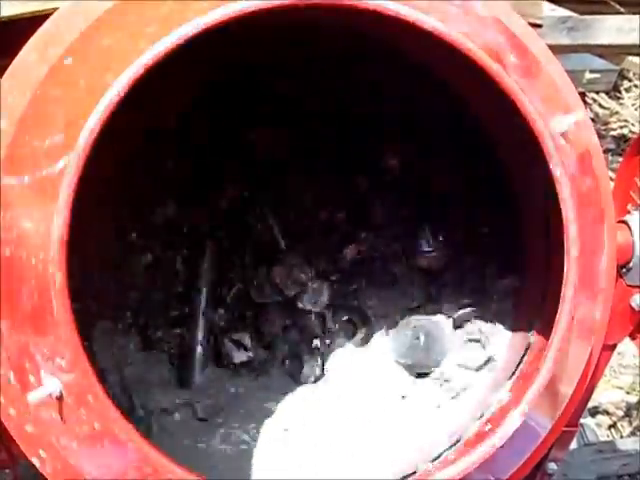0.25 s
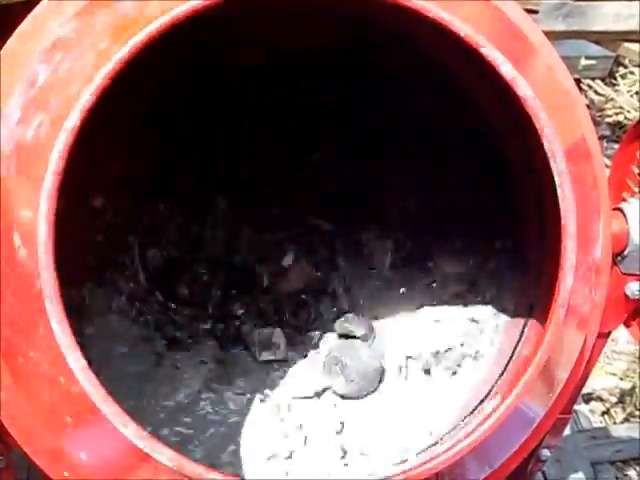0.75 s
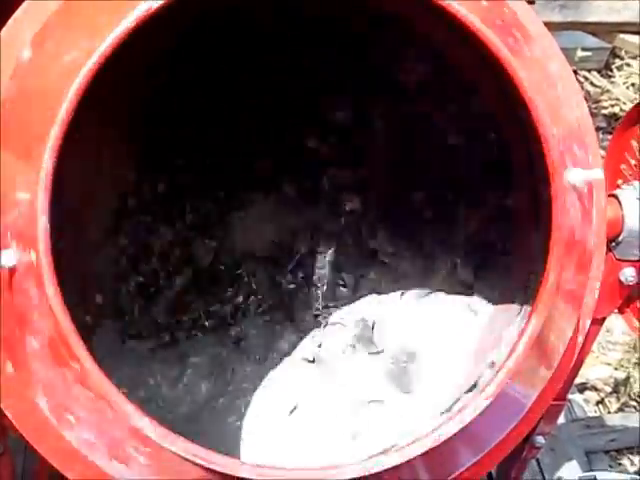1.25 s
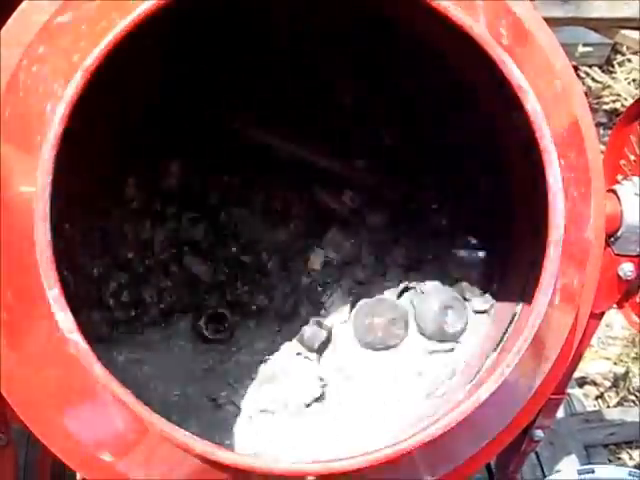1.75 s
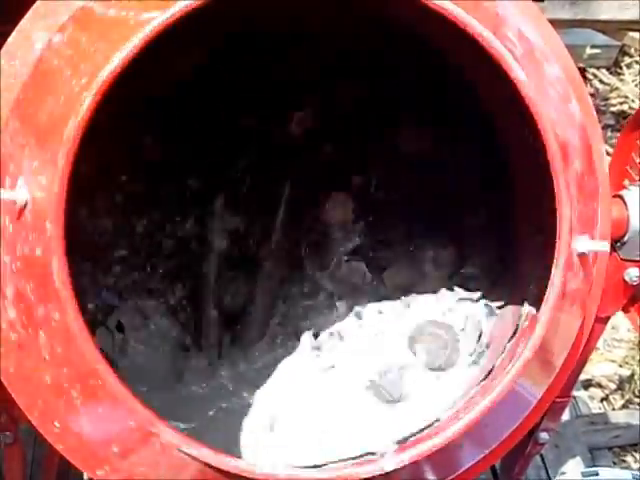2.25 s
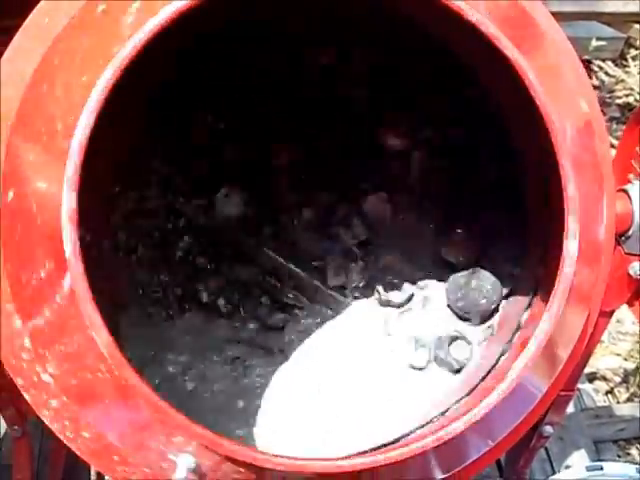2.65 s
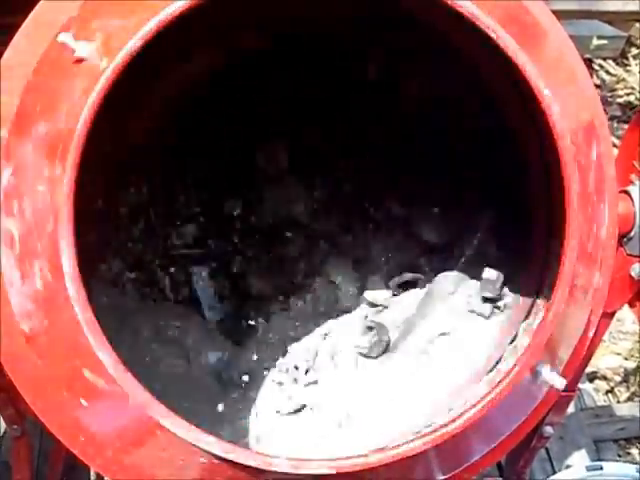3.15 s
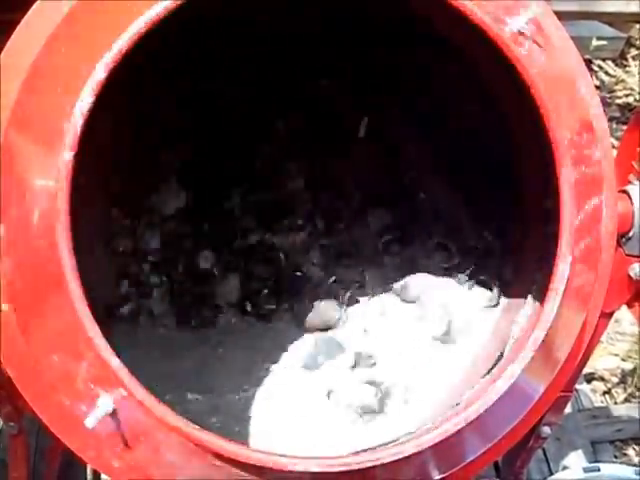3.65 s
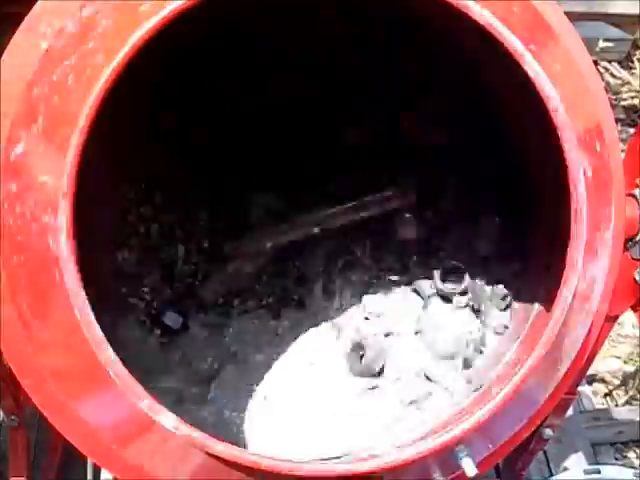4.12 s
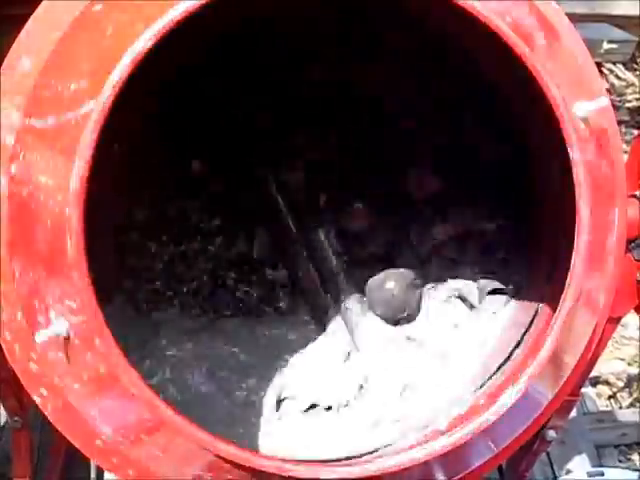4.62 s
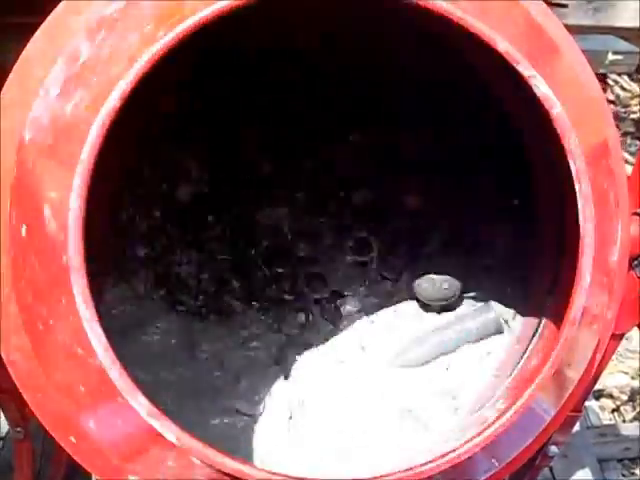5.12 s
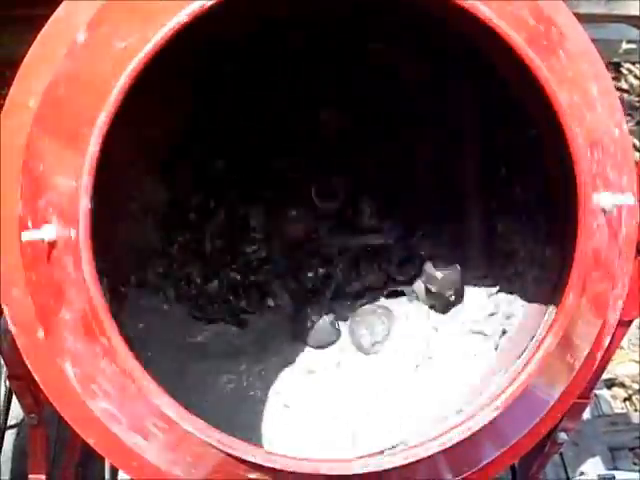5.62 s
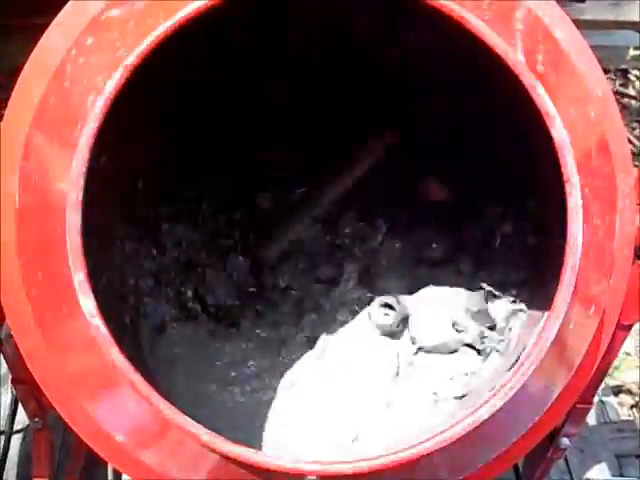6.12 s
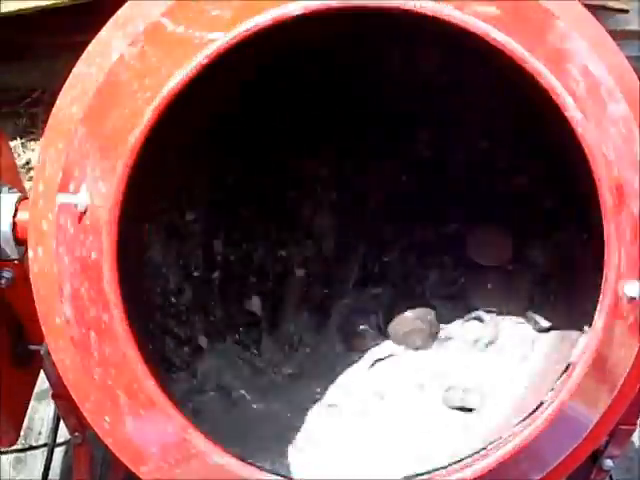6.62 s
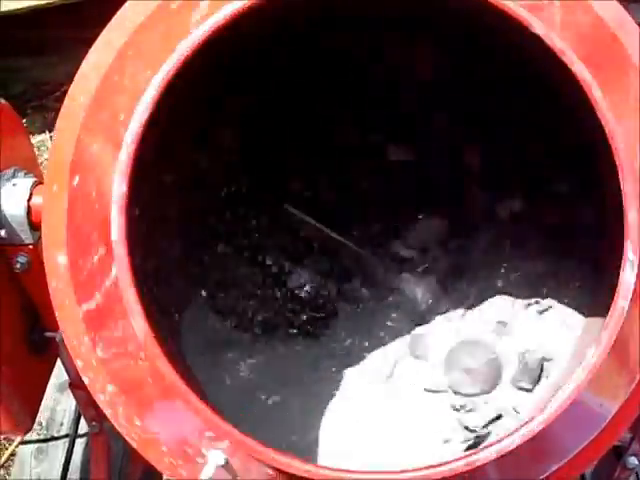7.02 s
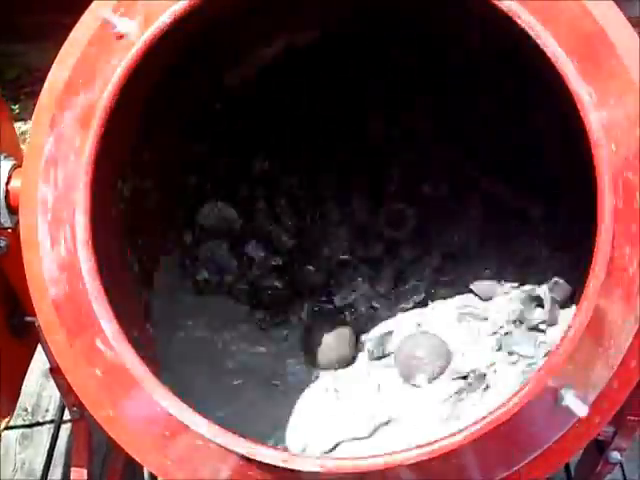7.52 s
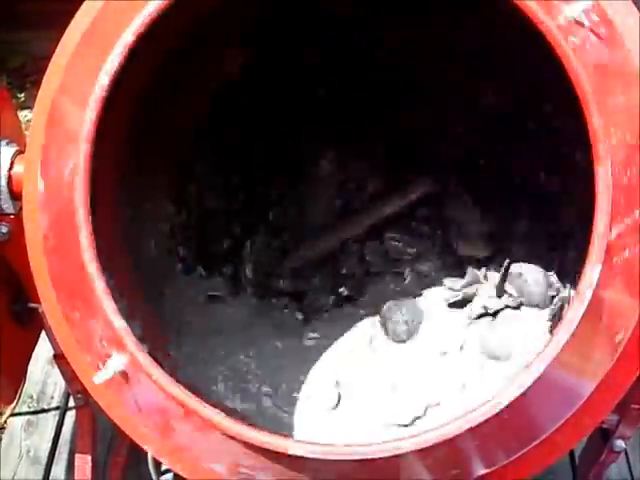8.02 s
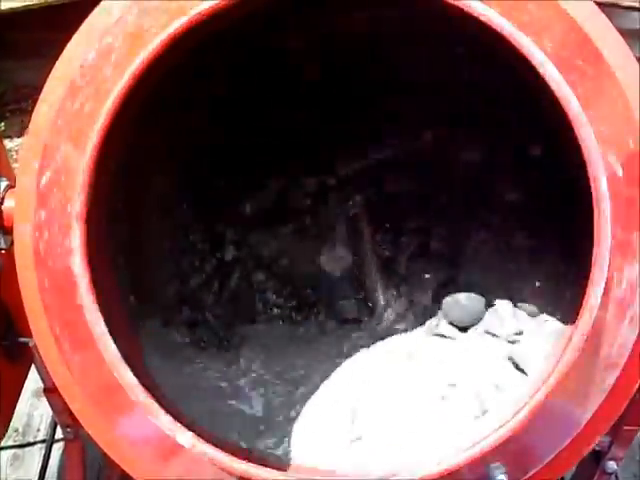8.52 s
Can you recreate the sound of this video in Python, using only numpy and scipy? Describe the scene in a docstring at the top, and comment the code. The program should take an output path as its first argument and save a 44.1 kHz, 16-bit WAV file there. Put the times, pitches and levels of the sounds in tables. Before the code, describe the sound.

An electric mixer's steel drum is already turning, close to the microphone, and keeps going for about nine seconds. Its gears and rolling load make a rumbling drone over a low hum, the tone shifting in a cycle of roughly 2.2 seconds. Grit hisses and small metal pieces patter constantly inside. Heavy steel balls and rods land irregularly, around ten times a second, with sharp cracks, midrange clunks and hollow booms from the shell. Harder hits come at about 1.1, 2.9, 3.1 and 3.7 seconds, with a deeper boom at 2.2. Short, bright steel rings stand out near 4 seconds, with a loud clang at 6.3 and a cluster around 8. The tumble swells and ebbs, thinning briefly near 4.2 and 6.6 seconds. The treble is slightly dull, and the hardest blows overload the microphone, followed by a quick dip in level.

```python
"""An electric mixer's steel drum turns, tumbling steel balls, rods and grit.
Gear teeth and the rolling load shake the shell into a rumbling drone, and the stand hums beneath it.
Grit hisses, small pieces clatter, heavy ones crack and boom on the wall, rods and other steel ring.
A small camera close by hears it through a narrow band, overloads on the hardest blows, then ducks."""
import sys
import numpy as np
from scipy import signal
from scipy.fft import rfft, irfft, next_fast_len
from scipy.io import wavfile
from scipy.ndimage import uniform_filter1d

SR = 44100
rng = np.random.default_rng(int(sys.argv[2]) if len(sys.argv) > 2 else 0)


def generate_wav(signal):
    """Clip the signal to [-1, 1] and save it as 16-bit WAV at the path in sys.argv[1]."""
    frames = np.transpose(np.atleast_2d(signal))
    scaled = np.clip(frames, -1, 1) * 32767
    pcm = np.round(scaled).astype(np.int16)
    wavfile.write(sys.argv[1], SR, pcm)


N = 386757
TEETH_PER_S, TURN_S = 44.0, 2.21
HEAVY, SMALL, LOW_SHAKE, SHELL_RING = 1, 2, 3, 4  # columns of the load's levels

# The drum shell's low, middle and high modes: pitch_hz, width_hz
SHELL_MODES = [(157, 12), (349, 14), (544, 7)]
# The bright tone of steel hitting steel: frequency_hz, level_db
STEEL_SPECTRUM = [(760, -34), (1300, -8), (1390, -8), (1490, -28.5), (1690, -6), (1890, -18.5), (2020, -9),
                  (2260, -12.5), (2500, -9), (2780, -2.5), (3450, -7.5), (3710, -5.5), (3880, -12),
                  (4060, -12), (4900, -12.5), (6370, -27.5), (10800, -120)]


def gain_of(db):
    """Decibels to a gain."""
    return 10 ** (np.asarray(db) / 20)


def unit_rms(x):
    """Scales to rms 1."""
    return x / np.sqrt(np.mean(x ** 2) + 1e-20)


def coloured(x, spectrum):
    """Equalises x along a curve of (frequency_hz, level_db) points."""
    hz, db = np.transpose(spectrum)
    bins_hz = np.fft.rfftfreq(len(x), 1 / SR)
    curve_db = np.interp(np.log(bins_hz + 1), np.log(hz), db, -90, -90)
    return irfft(rfft(x) * gain_of(curve_db), len(x))


def resonate(x, hz, width_hz):
    """One resonance as a complex wave: the real part is the sound, the magnitude its envelope."""
    radius = np.exp(-np.pi * width_hz / SR)
    return 2 * signal.lfilter([1 - radius], [1, -radius * np.exp(2j * np.pi * hz / SR)], x)


def burst(spectrum, t60_s, rise_s):
    """Many modes struck at once: coloured noise with a quick attack and a decay."""
    t = np.arange(8192) / SR
    noise = unit_rms(coloured(rng.standard_normal(len(t)), spectrum))
    return noise * (1 - np.exp(-t / rise_s)) * gain_of(-60 * t / t60_s) / 2


def struck(hz, t60_s):
    """One mode set ringing by a single blow."""
    t = np.arange(8192) / SR
    return np.sin(2 * np.pi * hz * t) * gain_of(-60 * t / t60_s) * (1 - np.exp(-t / 0.00077))


def knocks(spectrum, per_s, spread_db, t60_s, pitch_range_hz, pieces):
    """Random knocks of uneven force, each from one of several pieces with its own pitch."""
    out = np.zeros(N)
    for hz in np.geomspace(*pitch_range_hz, pieces):
        force = gain_of(spread_db * np.minimum(rng.exponential(1, N), 4))
        hits = force * (rng.random(N) < per_s / pieces / SR)
        knock = burst(spectrum, t60_s * rng.uniform(1.0, 1.2), rise_s=0.00026)
        ring = resonate(knock, hz, width_hz=0.049 * hz).real
        out += signal.oaconvolve(hits, knock + 3.2 * ring)[:N]
    return unit_rms(out)


def load_db(column):
    """The slow swell and ebb of one part of the tumble."""
    # The tumbling load's levels: time_s, heavy_db, small_db, extra_low_shake_db, extra_shell_ring_db
    levels = [(0.0, -25.5, -29.5, 1.5, -1), (0.51, -26, -30.5, 0, 2), (0.68, -23.5, -29.5, -2.5, 3),
              (2.29, -27, -32.5, -3, -3), (2.93, -21, -26, 2.5, 0.5), (3.32, -25.5, -31.5, 3, -0.5),
              (3.86, -26.5, -30, -3, 4), (3.98, -28, -30, 1, -1), (4.17, -33, -35, 0.5, -0.5),
              (4.64, -28, -33, -0.5, 3), (4.88, -21.5, -27, -1, 0.5), (6.2, -28, -30.5, -1.5, -0.5),
              (6.32, -24, -29, 4, -1), (6.6, -34, -31.5, -3, 3), (6.81, -25, -30.5, 5, -2),
              (7.3, -24.5, -27.5, -1.5, 3), (7.79, -28.5, -30.5, 3, 1.5), (8.21, -27, -31, -2.5, -1.5),
              (8.55, -24, -26, -2, 0), (8.77, -21.5, -27, 3, 0)]
    rows = np.array(levels)
    return np.interp(np.arange(N) / SR, rows[:, 0], rows[:, column])


def turn_gain(column, extra):
    """The load damps each mode in its own part of the turn; this cycle rides on the heavy pieces' level."""
    # Level offsets through one turn: time_s, low_mode_db, middle_mode_db, high_mode_db, stand_db
    one_turn = [(0.05, -2.5, -7, 3, -13), (0.3, -10.5, -2.5, 6.5, -10), (0.55, -9.5, -3.5, 9, -15),
                (0.75, -14.5, -3, 0, -15), (0.95, -12, -0.5, 11, -15), (1.15, -14.5, -4, -2, -14.5),
                (1.35, -6.5, -0.5, 8, -8), (1.55, 1, -9.5, -15, -8.5), (1.78, 5.5, -10.5, -4, -3.5),
                (1.95, -2.5, -6.5, -14.5, -8)]
    rows = np.array(one_turn)
    turn_db = np.interp(np.arange(N) / SR, rows[:, 0], rows[:, column], period=TURN_S)
    return gain_of(load_db(HEAVY) + load_db(extra) + turn_db)


def drum_shell():
    """Gear teeth tap the rim steadily and the load rolls unevenly, driving a rumble and three modes."""
    # The shell's broad rumble: frequency_hz, level_db
    rumble_spectrum = [(65, -44.5), (110, -21), (157, -13), (204, -25.5), (254, -7), (346, -8.5),
                       (383, -23.5), (415, -10), (445, -20), (541, 2), (599, -4.5), (1130, -13),
                       (1500, -39.5), (1700, -26.5), (2210, -62.5), (3740, -120)]
    drift = uniform_filter1d(uniform_filter1d(rng.standard_normal(N + 1), 1500), 1500)
    backlash_teeth = .02 * unit_rms(drift)
    tooth_count = np.floor(np.arange(N + 1) * TEETH_PER_S / SR + backlash_teeth)
    taps = np.diff(tooth_count) * gain_of(8.2 * np.clip(rng.standard_normal(N), -2, 1))
    drive = 0.56 * unit_rms(taps) + rng.standard_normal(N)
    drone = np.zeros(N)
    for k, (hz, width_hz) in enumerate(SHELL_MODES):
        swing = resonate(resonate(drive, hz, width_hz).real, hz, 5.8 * width_hz)
        sustained = swing.real / (abs(swing) + 1e-9) ** .7  # constantly driven, so steadier than noise
        drone += turn_gain(column=1 + k, extra=SHELL_RING if k else LOW_SHAKE) * unit_rms(sustained)
    tooth_thud = burst(rumble_spectrum, t60_s=0.095, rise_s=0.0068)
    gears = unit_rms(signal.oaconvolve(taps, tooth_thud)[:N])
    rolling = knocks(rumble_spectrum, per_s=420, spread_db=1.86, t60_s=0.17,
                     pitch_range_hz=(250, 1400), pieces=10)
    return drone + gain_of(load_db(HEAVY) + 2) * (1.613 * rolling + 1.08 * gears)


def stand_hum():
    """The stand hums at the tooth rate and its octave, and shakes loosely."""
    # The stand's low shudder: frequency_hz, level_db
    shake_spectrum = [(12, -40.5), (20, -7.5), (32, -15.5), (64, -5.5), (125, 2), (160, -33.5), (280, -120)]
    shake = unit_rms(coloured(rng.standard_normal(N), shake_spectrum))
    tooth_phase = 2 * np.pi * TEETH_PER_S * np.arange(N) / SR
    hum = 0.38 * np.sin(tooth_phase) + 0.58 * np.sin(2 * tooth_phase)
    return turn_gain(column=4, extra=LOW_SHAKE) * (0.72 * shake + hum)


def clatter():
    """Grit hisses down the wall under a patter of small pieces."""
    grit = unit_rms(coloured(rng.standard_normal(N), STEEL_SPECTRUM))
    patter = knocks(STEEL_SPECTRUM, per_s=300, spread_db=3.76, t60_s=0.056,
                    pitch_range_hz=(1600, 4800), pieces=14)
    return gain_of(load_db(SMALL) + 1.5) * (0.56 * grit + 1.58 * patter)


def ringing_steel():
    """Rods and other pieces bend in two planes, so close modes beat; contact with the load adds waver."""
    # Rings and swells of rods and other steel pieces, near 2.8 or 3.8 kHz:
    # start_s, level_db, pitch_hz, t60_s
    rings = [(0.0313, -3.5, 2790, 0.1), (1.8768, -9, 3770, 0.065), (2.201, -21, 2814, 0.32),
             (2.285, -18, 2810, 0.17), (2.4155, -8, 3766, 0.1), (2.915, -6, 3800, 0.061),
             (3.115, -5.5, 2844, 0.056), (3.395, -15.5, 3760, 0.039), (3.5917, -18, 3730, 0.18),
             (3.635, -15.5, 3800, 0.069), (4.0377, 2, 3800, 0.15), (4.368, -6, 3780, 0.11),
             (4.9846, -7, 2880, 0.052), (5.0694, -19.5, 3790, 0.081), (5.407, -8.5, 3750, 0.035),
             (5.8935, -7, 2755, 0.042), (5.897, -8.5, 3820, 0.11), (6.32, -5.5, 3845, 0.066),
             (6.329, 7, 2840, 0.12), (6.383, -2, 2810, 0.12), (6.5044, -18, 3760, 0.1),
             (6.57, -18, 3880, 0.059), (7.9341, -9, 2680, 0.085), (8.0292, -8.5, 3820, 0.23),
             (8.0563, -1.5, 3812, 0.16), (8.089, -6, 3746, 0.09), (8.2047, -21.5, 2820, 0.14),
             (8.519, -6, 3730, 0.028)]
    out = np.zeros(N + SR)
    t = np.arange(SR // 2) / SR
    attack = 1 - np.exp(-t / .0008)
    for start_s, level_db, hz, t60_s in rings:
        jostle = unit_rms(uniform_filter1d(rng.standard_normal(len(t)), 300))
        waver = gain_of(2.5 * np.minimum(t / .03, 1) * jostle)
        pair = 1.41 * np.sin(2 * np.pi * hz * t) + 0.47 * np.sin(2 * np.pi * .991 * hz * t)
        decay_db = 60 * (t / t60_s) ** 1.134  # steepens as the load smothers the ring
        out[round(start_s * SR):][:len(t)] += gain_of(level_db - decay_db) * pair * waver * attack
    return out[:N]


def heavy_blows():
    """Each heavy piece ticks and cracks on steel, clunks on the wall and sets the shell booming."""
    # Heavy pieces landing: start_s, crack_db, crack_hz, clunk_db, clunk_hz, boom_db, ring_db
    landings = [(0.0333, -9, 2820, -18, 690, -22, -6), (0.1281, -11, 2780, -27, 610, -30, -24),
                (0.1979, -15, 3060, -25.5, 633, -24, -8.5), (0.2848, -9.5, 3060, -14.5, 767, -18.5, -7),
                (0.4514, -23, 2670, -12.5, 820, -20, -5), (0.6559, -6.5, 2960, -23, 610, -24, -4.5),
                (0.7143, -3.5, 3150, -13, 895, -32, -10), (0.8355, -23, 2850, -16, 650, -26, -18),
                (0.8954, -17, 3060, -9, 853, -20, -17), (1.0625, 3, 2880, -1, 944, -14.5, -12),
                (1.3354, -12.5, 2450, -16, 780, -14, -19), (1.4157, -14, 3100, -13, 860, -15, -10.5),
                (1.6003, -6.5, 3590, -20, 940, -17, -17), (1.715, -7, 3100, -13.5, 897, -23, -24),
                (1.7654, -5, 2500, -14.5, 1154, -25, -30), (1.7824, -10, 2840, -9, 813, -23, -28),
                (1.8334, -17, 2910, -5.5, 907, -23, -10), (2.0744, -17, 3180, -5, 1085, -24, -11),
                (2.1314, -15, 3650, -10, 737, -22, -16), (2.15, -10, 2620, -11.5, 730, -22, -14),
                (2.1934, -13, 2750, -15, 678, -4, -19), (2.3264, -15, 2690, -10.5, 1100, -20, -17),
                (2.3564, -21.5, 2690, -6, 1100, -38, -15.5), (2.4169, -9, 3790, -15, 940, -33, -22),
                (2.4568, -8, 3000, -33, 910, -31, -34), (2.5504, -14, 2720, -16, 826, -20.5, -10),
                (2.7566, -10.5, 2990, -15, 1244, -21, -21), (2.8654, -11, 2000, -14.5, 622, -18, -10.5),
                (2.9143, 0, 3670, -23, 624, -21, -15), (3.031, -12, 2950, -27, 650, -16, -2.5),
                (3.1114, 3.5, 2720, -7, 598, -19, -19), (3.2435, -9.5, 2810, -7, 1114, -22, -27),
                (3.4156, -10, 3800, -28, 921, -36, -12), (3.5453, -1.5, 3450, -10.5, 1110, -27, -30),
                (3.6631, -9, 3300, -11.5, 622, -20, -25), (3.705, 0, 3200, -24, 1115, -31, -24),
                (3.7898, -4.5, 2700, -13.5, 670, -28, -20), (3.8864, -12.5, 2900, -7.5, 756, -26, -34),
                (3.9599, -15, 2800, -19, 638, -22, -29), (4.0098, -11, 2210, -7, 1110, -16, -13),
                (4.0372, -6, 3780, -29, 643, -32, -28), (4.1584, -8.5, 2830, -12, 1100, -30, -16),
                (4.1904, -1.5, 2980, -10.5, 1146, -30, -14), (4.3644, -5, 3700, -12, 824, -38, -26),
                (4.4393, -9, 2940, -7, 885, -26, -5.5), (4.6972, -17, 2860, -20, 624, -11, -13.5),
                (4.7436, -16, 2040, -19.5, 686, -15, -13), (4.7701, -6.5, 2690, -16, 1060, -20, -8),
                (4.8893, -7, 2860, -10, 656, -14, -2), (4.9851, -22, 2820, -25, 641, -24, -18),
                (5.0225, -7, 3140, -26, 676, -19, -20), (5.0524, -14, 2870, -28, 624, -19, -4.5),
                (5.1704, -9.5, 2810, -16, 686, -16.5, -14), (5.225, -16, 2800, -22, 613, -26, -9),
                (5.444, -6, 2760, -21, 746, -11, -9), (5.5692, -5.5, 3160, -18, 655, -24, -12.5),
                (5.7229, -8.5, 2780, -17.5, 859, -26, -11), (5.8007, -0.5, 3400, -11, 1030, -22, -24),
                (5.8571, -6, 2920, -13, 840, -34, -11), (5.9713, -8, 3150, -16, 930, -37, -37),
                (6.0636, -5.5, 2710, -13, 850, -34, -17), (6.3195, -1.5, 3900, -10.5, 947, -8.5, -23),
                (6.327, 5, 2860, -19, 830, -23, -24), (6.6164, -25, 2760, -12, 888, -21.5, -38),
                (6.6474, -8.5, 2940, -15, 920, -23.5, -30), (6.8594, -16, 2010, -21, 623, -17, -6.5),
                (6.9446, -8, 3200, -17.5, 627, -17, -15), (7.0549, -7.5, 2650, -31, 634, -18, -20),
                (7.2284, -18, 3090, -17.5, 1200, -24, -9.5), (7.3687, -2, 3120, -9.5, 620, -37.5, -20),
                (7.4759, -7.5, 2930, -30, 614, -26.5, -4.5), (7.673, -10.5, 2830, -6.5, 1110, -38, -10.5),
                (7.7194, -9, 2800, -11.5, 1230, -22, -11), (7.7682, -6, 3130, -12.5, 1200, -25, -16),
                (7.9339, -1, 2540, -22, 983, -30, -12), (8.0204, -6, 3800, -18.5, 700, -28, -15),
                (8.0684, -2.5, 3830, -8, 683, -32, -28), (8.2332, -14.5, 2830, -9, 1046, -17.5, -29),
                (8.2551, -10.5, 2980, -17, 858, -21, -22), (8.4402, -10.5, 3370, -12, 880, -37, -22),
                (8.4796, -5, 3100, -12, 908, -26, -24), (8.6694, -15, 3110, -19.5, 705, -12, -20)]
    # The first contact of steel on steel: frequency_hz, level_db
    tick_spectrum = [(3000, -24.5), (4600, -2), (5800, -1), (7500, -38)]
    # The wall's midrange clunk: frequency_hz, level_db
    clunk_spectrum = [(300, -33.5), (600, -10.5), (900, 10), (1300, 2), (1500, -9), (1750, -14),
                      (2300, -30.5)]
    middle_mode_hz, high_mode_hz = SHELL_MODES[1][0], SHELL_MODES[2][0]
    boom = 0.66 * struck(270, t60_s=0.092) + 1.3 * struck(410, t60_s=0.06)
    boom += 0.37 * struck(middle_mode_hz, t60_s=0.73)
    ring = struck(high_mode_hz, t60_s=.22)
    out = np.zeros(N + SR)
    for start_s, crack_db, crack_hz, clunk_db, clunk_hz, boom_db, ring_db in landings:
        snap = burst(STEEL_SPECTRUM, t60_s=0.069, rise_s=0.00023)
        tick = burst(tick_spectrum, t60_s=0.046, rise_s=0.0001)
        crack = 0.53 * snap + 1.22 * resonate(snap, crack_hz, width_hz=600).real + 0.4 * tick
        clunk = 1.55 * burst(clunk_spectrum, t60_s=0.093, rise_s=0.0007)
        clunk += 0.79 * struck(clunk_hz, t60_s=0.13)
        blow = gain_of(crack_db) * crack + gain_of(clunk_db) * clunk
        blow += gain_of(boom_db) * boom + gain_of(ring_db) * ring
        out[round(start_s * SR):][:len(blow)] += blow
    return out[:N]


def dip_gain():
    """The tumble dips briefly, mostly just after a heavy blow: quickly down, slowly back."""
    # Dips in the tumble's level (a negative depth is a lift): start_s, depth_db
    dips = [(0.719, 8), (1.07, 2), (1.43, 2.5), (1.85, 4), (2.4, 5), (3.25, 8), (3.72, 2.5), (4.04, -2),
            (4.2, 5.5), (4.5, 4.5), (5.1, 3.5), (5.881, 4), (6.34, 2), (6.701, 3), (6.92, 4.5), (8.07, 3.5),
            (8.55, 3.5)]
    fall_s, return_s = 0.026, .12
    t = np.arange(SR) / SR
    shape = (1 - np.exp(-t / fall_s)) * np.exp(-(t / return_s) ** 2)
    level_db = np.zeros(N + SR)
    for start_s, depth_db in dips:
        level_db[round(start_s * SR):][:SR] -= depth_db * shape / shape.max()
    return gain_of(level_db[:N])


def scene():
    """The tumbling bed with blows and ringing steel on top, the same in both channels."""
    tumble = dip_gain() * (drum_shell() + stand_hum() + clatter())
    return np.tile(tumble + heavy_blows() + ringing_steel(), (2, 1))


def record(dry):
    """The camera ducks too late, so hard blows clip; it dulls the treble and the left channel trails."""
    threshold_db, duck_delay_s, left_lag_s = -13.0, 0.022, .000084
    narrow_band_hz, band_limit_hz = 6430, 15800
    samples = np.arange(N)
    level_db = 20 * np.log10(uniform_filter1d(abs(dry[0]), 200) + 1e-9)
    release_db = samples * 65.4 / SR
    held_db = np.maximum.accumulate(level_db + release_db) - release_db  # holds each peak, then sinks
    over_db = uniform_filter1d(np.maximum(held_db - threshold_db, 0), 300)
    duck_db = 0.65 * np.interp(samples - duck_delay_s * SR, samples, over_db)
    clipped = np.clip(dry[0] / gain_of(duck_db), -.99, .99)
    narrow_band = signal.firwin(111, narrow_band_hz, window=("kaiser", 10), fs=SR)
    band_limit = signal.firwin(511, band_limit_hz, window=("kaiser", 9), fs=SR)
    dulled = signal.oaconvolve(clipped, narrow_band, "same")
    right = signal.oaconvolve(np.clip(dulled, -1, 1), band_limit, "same")
    size = next_fast_len(N + 64)
    lag = np.exp(-2j * np.pi * np.fft.rfftfreq(size, 1 / SR) * left_lag_s)
    left = irfft(rfft(right, size) * lag, size)[:N]
    return np.clip([left, right], -1, 1)


dry = scene()
out = record(dry)
generate_wav(out)
```